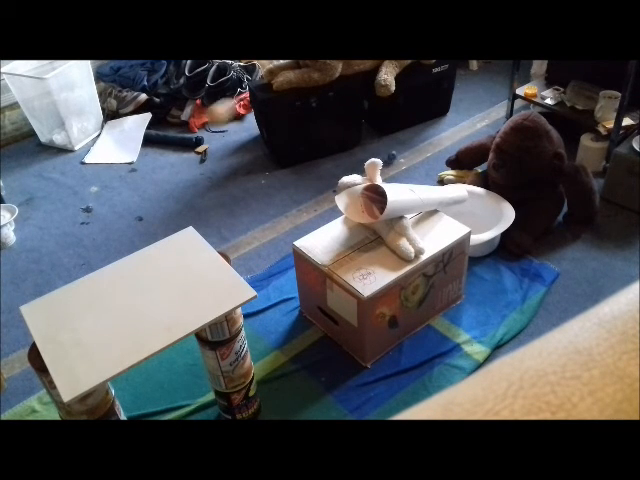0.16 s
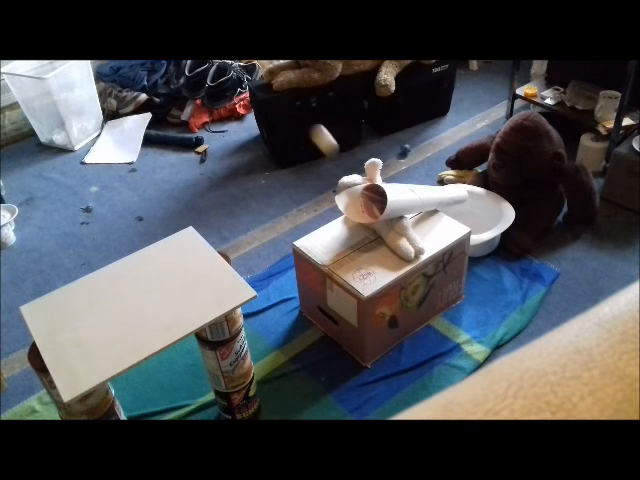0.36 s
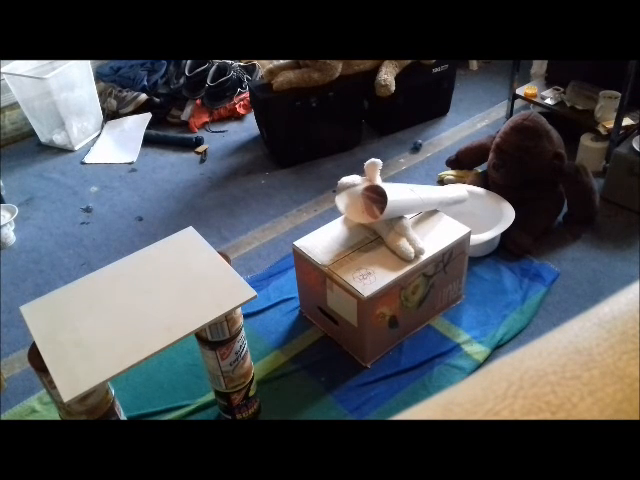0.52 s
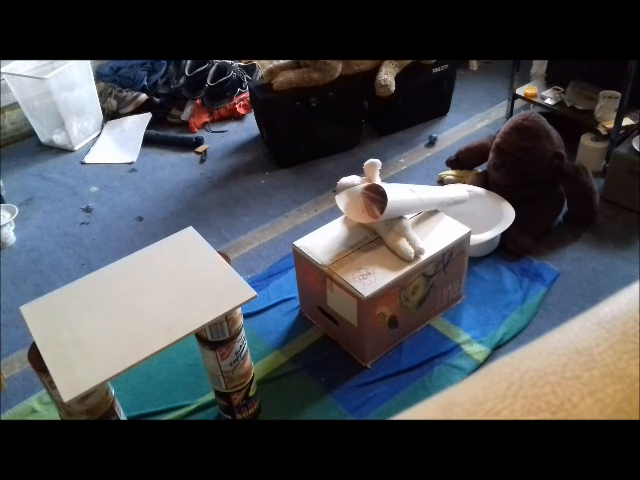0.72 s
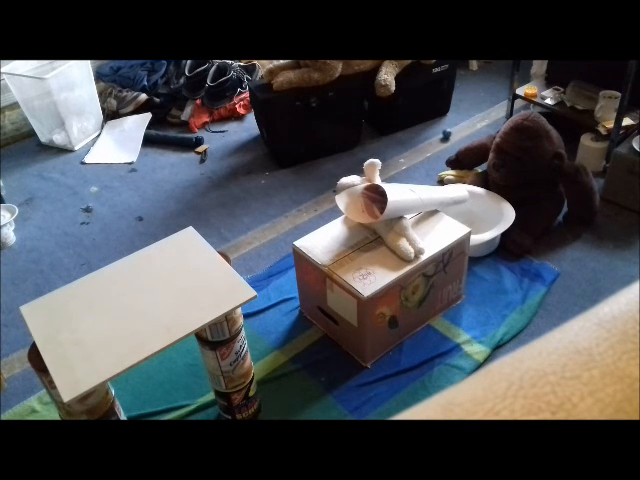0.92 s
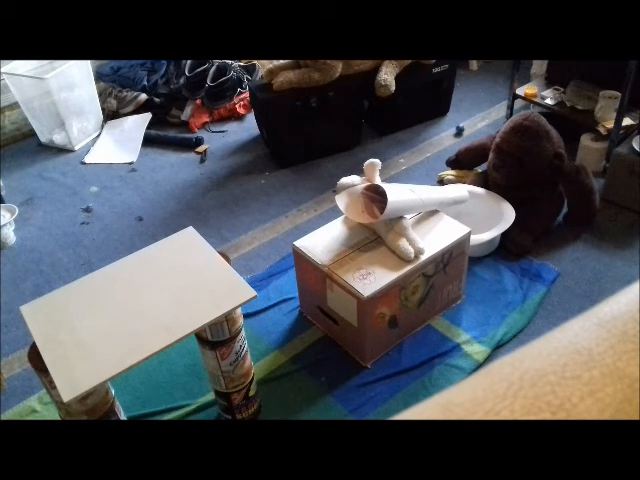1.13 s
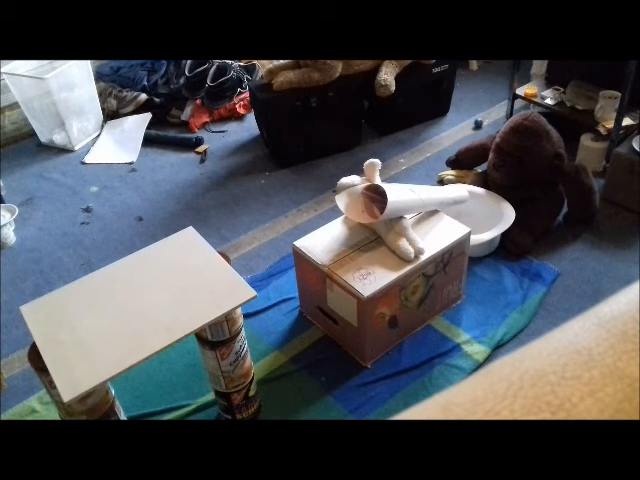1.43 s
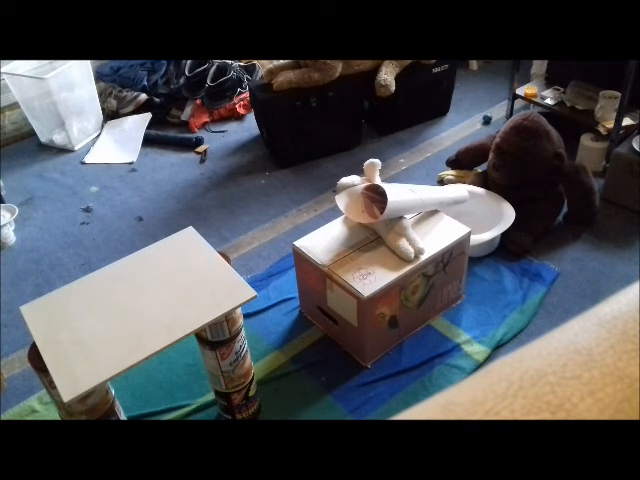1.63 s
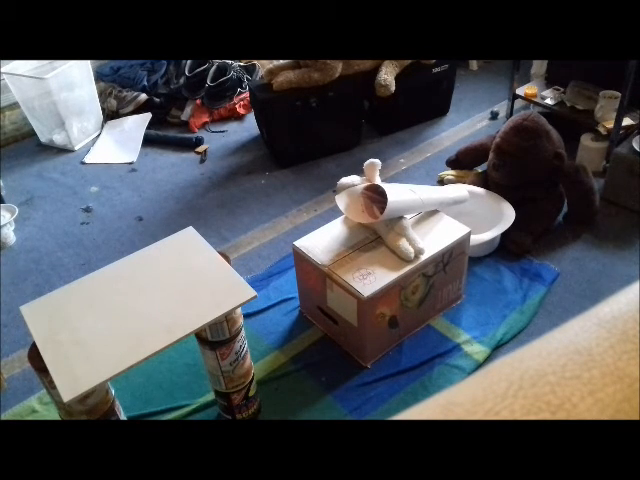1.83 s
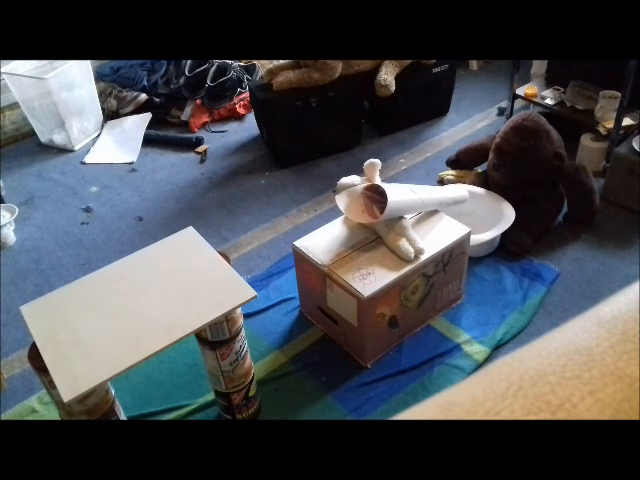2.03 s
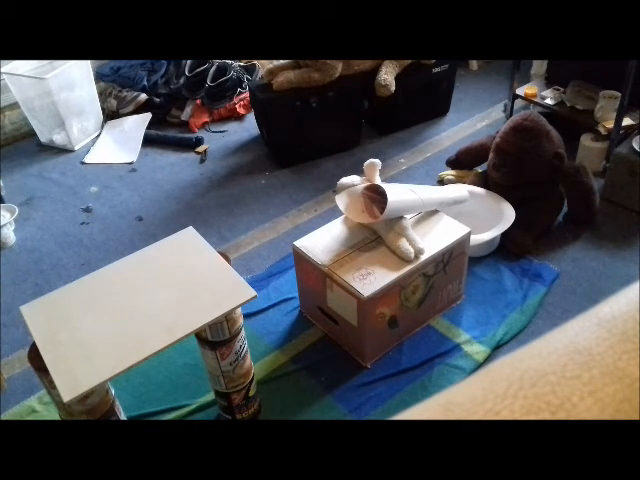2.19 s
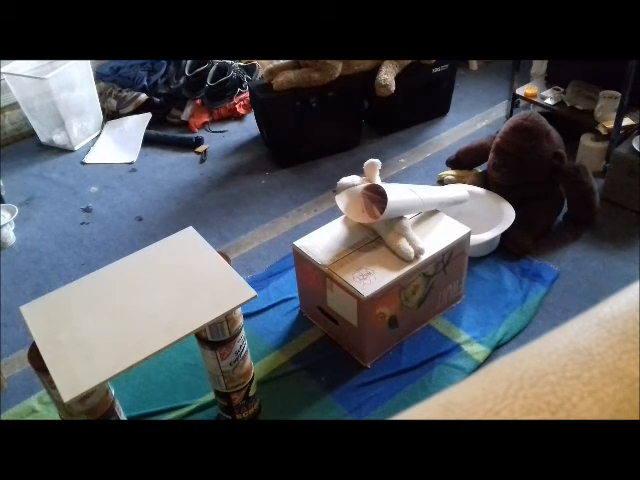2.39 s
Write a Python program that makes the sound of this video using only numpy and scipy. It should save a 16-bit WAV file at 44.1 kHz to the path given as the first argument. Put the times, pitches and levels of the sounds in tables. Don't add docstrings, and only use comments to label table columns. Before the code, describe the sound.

One sharp hollow ball knock on a board, shrinking rattly hops, a softer boxy hit on a carton, muffled carpet bounces, then a brief cloth rustle and distant tap; dull small camera microphone, faint room hum.

```python
import sys
import numpy as np
from scipy import signal
from scipy.fft import rfft, irfft, next_fast_len
from scipy.io import wavfile
from scipy.ndimage import uniform_filter1d

SR = 44100
rng = np.random.default_rng(int(sys.argv[2]) if len(sys.argv) > 2 else 0)


def dump_mix(stems):
    frames = np.atleast_2d(stems).T
    limited = np.clip(frames, -1, 1)
    pcm = np.round(limited * 32767).astype(np.int16)
    wavfile.write(sys.argv[1], SR, pcm)


def undo_db(level):
    steps = np.asarray(level, float) / 20
    return 10 ** steps


N = 112454
T = np.arange(N) / SR
TAIL = np.arange(SR // 2) / SR

# delay in seconds, level in dB.
BOARD_ECHOES = [(.0012, -0.5), (.0055, -3.5), (.0082, 5), (.0195, -8), (.026, -2)]
CARTON_ECHOES = [(.004, -3.5), (.0095, -13), (.016, -8), (.023, -2)]
FAR_ECHOES = [(.004, -6.5), (.0095, -11), (.017, -8), (.023, -6)]


def gains(points, size):
    hz, db = np.array(points, float).T
    bin_hz = np.arange(size // 2 + 1) * SR / size
    return undo_db(np.interp(np.log(bin_hz + 1), np.log(hz), db))


def causal(points):
    cepstrum = irfft(np.log(gains(points, size=4096)))
    cepstrum[1:2048] *= 2
    cepstrum[2049:] = 0
    return irfft(np.exp(rfft(cepstrum)))[:2048]


def rms1(x):
    return x / np.sqrt(np.mean(x ** 2))


def hiss(points):
    size = next_fast_len(N)
    spectrum = rfft(rng.standard_normal(size)) * gains(points, size=size)
    return rms1(irfft(spectrum, size)[:N])


def room(echoes, tail_db):
    # frequency in Hz, t60 in seconds.
    reverberation = [(150, 0.42), (600, 0.27), (2000, 0.31), (5000, 0.23), (12000, 0.55)]
    hz_points, t60_points = np.array(reverberation).T
    bin_hz = np.arange(len(TAIL) // 2 + 1) * SR / len(TAIL)
    noise = rfft(rng.standard_normal((2, len(TAIL))))
    response = 0
    for hz in 100 * 2. ** np.arange(8):
        share = np.clip(1 - np.abs(np.log2((bin_hz + 1) / hz)), 0, 1)
        t60 = np.interp(np.log(hz), np.log(hz_points), t60_points)
        response = response + irfft(noise * share) * undo_db(-60 * TAIL / t60)
    build_s, side_db = 0.0024, -73
    response = response * (1 - np.exp(-TAIL / build_s)) * undo_db(tail_db)
    response[0, 0] += 1
    for delay, db in echoes:
        response[0, int(delay * SR)] += undo_db(db)
    response[1] *= undo_db(side_db) * 2
    return response


def crack_sound(crack, pitch):
    smear = 0.59
    pulse = causal([(hz * pitch, db) for hz, db in crack])
    for lag in rng.integers(3, 18, 3):
        a = np.r_[1, np.zeros(lag - 1), -smear]
        pulse = signal.lfilter(a[::-1], a, pulse)
    return pulse


def knock(hits, crack, place, modes=(), ring_db=0, swell_s=.002, damped_s=1.):
    out = np.zeros((2, N + SR))
    early = int(.03 * SR)
    damp = undo_db(-60 * np.maximum(TAIL - damped_s, 0) / 0.079)
    for start, db, *factor in hits:
        pitch = factor[0] if factor else 1.
        pulse = crack_sound(crack, pitch)
        heard = signal.fftconvolve(place, pulse[None], axes=1)[:, :len(TAIL)]
        heard = heard / heard[0, :early].std()
        for hz, mode_db, t60 in modes:
            swell = 1 - np.exp(-TAIL / swell_s * (hz / 500) ** 2)
            decay = undo_db(ring_db + mode_db - 60 * TAIL / t60)
            heard[0] += decay * swell * damp * np.sin(2 * np.pi * pitch * hz * TAIL)
        i = int(start * SR)
        out[:, i:i + len(TAIL)] += heard * undo_db(db) / heard[0, :early].std()
    return out[:, :N]


def background():
    # frequency in Hz, level in dB per Hz.
    hum_colour = [(20, -30), (45, -13), (300, -6), (800, -7.5), (2500, -12), (4500, -13.5), (5000, -24),
                  (6500, -29)]
    hiss_colour = [(4500, -20), (6000, 0), (9200, -1), (10000, -9), (10900, 0), (14200, 0), (14950, -8),
                   (15500, -3)]
    side_colour = [(12, -18), (20, -27), (175, -3), (315, -5.5), (452, -5.5), (686, -6.5), (1630, -4.5),
                   (6010, -17), (15500, -20.5)]
    hold = SR // 6
    drift = uniform_filter1d(np.repeat(rng.standard_normal(N // hold + 1), hold), hold)[:N]
    mid = hiss(hum_colour) * undo_db(-64 + 0.4 * drift) + hiss(hiss_colour) * undo_db(-78.7)
    return np.array([mid, hiss(side_colour) * undo_db(-68)])


def cloth():
    # time in seconds, level in dB, tilt in dB (treble raised and lows cut about
    # 2 kHz).
    pulls = [
        [(0, -51.5, 4.5), (.03, -61, 0.5), (.085, -89, -6)],
        [(.755, -91, -6), (.775, -54.5, 1), (.81, -53.5, -0.5), (.85, -62.5, 1.5), (.892, -53.5, 3.5),
         (.925, -60.5, -3.5), (.95, -56, -3)],
        [(1.78, -69, -4), (1.815, -48, -3.5), (1.83, -55.5, -0.5), (1.845, -43, -3), (1.878, -39, 1.5),
         (1.91, -44, -2.5), (1.94, -47.5, 8.5), (1.96, -59, -5)],
        [(1.96, -49.5, 4), (2.015, -50, -4), (2.06, -66, 0), (2.08, -60.5, -5), (2.084, -47.5, -0.5),
         (2.1, -60.5, 3), (2.17, -67.5, 0)],
    ]
    # frequency in Hz, level in dB.
    weave = [(150, -9.5), (780, 4.5), (1050, 1.5), (1500, 1.5), (2000, 2), (3000, -1.5), (4400, 1),
             (9000, -6)]
    # frequency in Hz, bandwidth in Hz, level in dB.
    resonances = [(990, 70, 0), (1500, 70, -2), (2270, 90, -3), (3530, 120, -2), (4130, 150, 2),
                  (4330, 150, 2), (4700, 150, 1)]
    grains_per_s, spread_db = 5000, 2.1
    chance, sign, size = rng.random((3, N))
    grains = (chance < grains_per_s / SR) * np.sign(sign - .5) * undo_db(-spread_db * np.log(size + .015))
    body = signal.fftconvolve(grains, causal(weave))[:N]
    rings = 0
    for hz, width, db in resonances:
        rings = rings + undo_db(db) * np.sin(2 * np.pi * hz * TAIL) * np.exp(-np.pi * width * TAIL)
    body = rms1(body) + undo_db(-13.0) * rms1(signal.fftconvolve(grains, rings)[:N])

    rows = np.concatenate([np.array(pull, float) for pull in pulls])
    time, level_db, tilt = rows.T
    moving = sum((T > p[0][0] - .004) & (T < p[-1][0] + .004) for p in pulls) > 0
    low = signal.sosfilt(signal.butter(2, 2000, fs=SR, output="sos"), body)
    tilt_db = np.interp(T, time, tilt)
    body = low * undo_db(-tilt_db) + (body - low) * undo_db(tilt_db)
    rubbed = body * moving * undo_db(np.interp(T, time, level_db))
    place = room([], tail_db=-37.5)
    place = place / np.sqrt(np.sum(place[0] ** 2))
    return signal.fftconvolve(place, rubbed[None], axes=1)[:, :N] * undo_db(-1.0)


def ticks():
    # start in seconds, early rms level in dB, pitch factor.
    slips = [(.772, -56.5, 1.01), (.886, -59.5, 1.05), (1.787, -66.5, 0.85), (1.81, -74, .98),
             (1.839, -50, 0.93), (1.859, -66, 1.3), (1.866, -46, 1.09), (1.876, -56, 0.86),
             (1.934, -44, .99), (1.942, -50, 0.91), (2.078, -66, 1.1), (2.088, -52.5, 1.02)]
    # frequency in Hz, level in dB, t60 in seconds.
    slip_modes = [(1008, 3, 0.12), (1414, -10, .06), (2294, -6, 0.11), (4400, -8, 0.1), (4300, 2, .09),
                  (4300, -10, 0.065)]
    # frequency in Hz, level in dB.
    slip_crack = [(300, -23), (1000, -8), (2000, -11), (3000, -12), (4300, 6), (5200, -20), (7500, -5.5)]
    place = room(CARTON_ECHOES, tail_db=-16)
    return knock(slips, slip_crack, place, slip_modes, ring_db=0, swell_s=0.024)


def last_tap():
    # start in seconds, level in dB.
    tap_hits = [
        (2.233, -44),
        (2.335, -60),
    ]
    # frequency in Hz, level in dB, t60 in seconds.
    tap_modes = [(626.6, 6, 0.11), (1005, -10, 0.4), (1030, -16, 0.17), (1587, -16, 0.34),
                 (1770, -17, 0.29), (2370, -9, 0.14), (2410, -8, 0.18), (3180, -13, 0.15),
                 (3429, -10, 0.19), (3300, -11.5, 0.26), (4124, -7, 0.22), (4100, -11, 0.17),
                 (4400, -13, 0.32), (4350, -15, 0.24)]
    # frequency in Hz, level in dB.
    tap_crack = [(200, -22), (620, 7), (1400, 0), (2100, -3), (2500, 0), (4200, 5.5), (5200, -1),
                 (7500, -10)]
    place = room(FAR_ECHOES, tail_db=-2)
    return knock(tap_hits, tap_crack, place, tap_modes, ring_db=3.5, swell_s=0.013)


def soft_landings():
    # start in seconds, level in dB, pitch factor.
    landings = [
        (1.0535, -48.5, 0.92),
        (1.092, -57, 1.13),
        (1.206, -56.5, 1.24),
    ]
    # frequency in Hz, level in dB, t60 in seconds.
    pile_modes = [(179, 8, 0.036), (220, 0, 0.077), (297, -6, 0.13), (420, -3, 0.046), (514, -6, 0.06),
                  (773, -7, 0.061), (920, -6, .04)]
    # frequency in Hz, level in dB.
    pile_crack = [(100, -2), (250, -1), (800, -8.5), (1800, -8.5), (3000, -16), (6000, -25)]
    place = room(FAR_ECHOES, tail_db=-16)
    return knock(landings, pile_crack, place, pile_modes, ring_db=7.5, swell_s=0.00016)


def carpet_thud():
    # start in seconds, level in dB.
    thud_hits = [
        (.9745, -40.5),
    ]
    # frequency in Hz, level in dB, t60 in seconds.
    floor_modes = [(285, -5, 0.042), (374, 6.5, 0.085), (464, -28, .1), (499.6, 1, 0.096),
                   (790, -13, 0.083), (832, -7, 0.083)]
    # frequency in Hz, level in dB.
    floor_crack = [(100, -17), (450, 7), (1000, -2), (2000, -12), (4200, -12), (6000, -28)]
    place = room(FAR_ECHOES, tail_db=-16)
    return knock(thud_hits, floor_crack, place, floor_modes, ring_db=8.5, swell_s=0.0011)


def skipping_bit():
    # start in seconds, level in dB, pitch factor.
    hop_hits = [
        (.095, -48, 1.08),
        (.2835, -45, 1.22),
        (.372, -53.5, 1.01),
        (.444, -53.5, 1.12),
        (.508, -54, 1.044),
        (.565, -56, 0.99),
        (.617, -61, 1),
    ]
    # frequency in Hz, level in dB, t60 in seconds.
    hop_modes = [(1355, -3, 0.089), (1757, 0, 0.093), (3080, -6.5, 0.099), (3310, -3.5, .1),
                 (3600, -3, 0.11)]
    # frequency in Hz, level in dB.
    hop_crack = [(300, -17.5), (900, -5), (1600, 1), (2450, -10), (3050, -0.5), (3450, 1.5), (3900, -11),
                 (5500, -8)]
    place = room(BOARD_ECHOES, tail_db=-26)
    return knock(hop_hits, hop_crack, place, hop_modes, ring_db=-4.5, swell_s=0.057)


def shell_clicks():
    # start in seconds, early rms level in dB.
    click_hits = [
        (.1315, -56),
        (.2835, -69),
        (.656, -74.5),
    ]
    # frequency in Hz, level in dB.
    click_crack = [(7000, -27), (7600, -12), (8400, -2.5), (10000, -13), (11900, -1.5), (13000, -9),
                   (14400, -5), (15200, -33)]
    return knock(click_hits, click_crack, room(BOARD_ECHOES, tail_db=-26))


def ball_on_carton():
    # start in seconds, early rms level in dB.
    carton_hits = [
        (.656, -29.5),
    ]
    # frequency in Hz, level in dB, t60 in seconds.
    carton_modes = [(440, 3, 0.18), (467.3, -9, 0.3), (737, -10, 0.17), (850, -3, 0.1), (919, 1.5, 0.069),
                    (1050, -6, 0.14), (1222, -4.5, 0.15), (1410, -10, 0.18), (1584, -18, 0.23),
                    (1911, -20, 0.28)]
    shell_modes = [(2060, -8, .13), (2191, -8, 0.14), (2365, -10, 0.076), (2590, -25, 0.12),
                   (3110, -15, 0.11), (3280, -4.5, 0.068), (3520, -4, 0.078), (3420, -12, 0.15),
                   (4080, -2, 0.067), (4340, -15, 0.069), (4300, -5.5, 0.12), (4400, -10, 0.099),
                   (4430, -22, .051), (6140, 0, 0.04)]
    # frequency in Hz, level in dB.
    carton_crack = [(100, -23), (400, 3.5), (900, 3.5), (1700, -3), (3000, -1), (4500, -3), (5200, -9),
                    (7000, -6.5)]
    place = room(CARTON_ECHOES, tail_db=-16)
    return knock(carton_hits, carton_crack, place, carton_modes + shell_modes, ring_db=2.5, swell_s=0.0077)


def ball_on_board():
    # start in seconds, early rms level in dB.
    board_hits = [
        (.1315, -18),
    ]
    # frequency in Hz, level in dB, t60 in seconds.
    board_modes = [(615, 0, .27), (285, -22, .2), (440, -19, .2), (775, -9, .14), (838, -15, .12),
                   (901, -12, .2), (1023, -16, .15), (1115, -14, .13), (1322, -13, .22), (1402, -9, .13),
                   (1468, -9, .12), (1567, -16, .18), (1655, -12, .25), (2018, -10, .15)]
    shell_modes = [(1805, -21, 0.11), (2200, -29.5, 0.176), (2517, -21, 0.15), (2946, -21.5, 0.094),
                   (3133, -13, 0.062), (3290, -23, .2), (3510, -16.5, 0.13), (3881, -32, 0.16),
                   (4090, -39.5, 0.18), (4550, -29.5, 0.22), (4720, -31, 0.36), (4640, -33.5, 0.31)]
    # frequency in Hz, level in dB.
    board_crack = [(100, -18.5), (300, -2), (800, 9.5), (1500, 3), (2150, 7.5), (2650, -8.5), (3400, 0.5),
                   (5300, -5)]
    place = room(BOARD_ECHOES, tail_db=-18.0)
    return knock(board_hits, board_crack, place, board_modes + shell_modes, ring_db=8.5,
                 swell_s=0.0046, damped_s=0.136)


def mic(x):
    # frequency in Hz, level in dB.
    treble = [(4720, 0), (4870, -4), (5500, -12), (5950, -24), (6500, -16), (7100, -24), (7600, -43),
              (15000, -38)]
    x = signal.sosfilt(signal.butter(5, 141, "high", fs=SR, output="sos"), x)
    return signal.fftconvolve(x, causal(treble)[None], axes=1)[:, :N]


def scene():
    near = cloth() + ticks() + last_tap() + soft_landings() + carpet_thud()
    near = near + skipping_bit() + ball_on_carton() + ball_on_board()
    mid, side = background() + shell_clicks() + mic(near)
    return np.array([mid + side, mid - side])


def roll_off(x):
    return signal.sosfilt(signal.butter(12, 15640, fs=SR, output="sos"), x)


def record(dry):
    mix = dry - .0005
    return roll_off(mix)


dry = scene()
out = record(dry)
dump_mix(out)
```